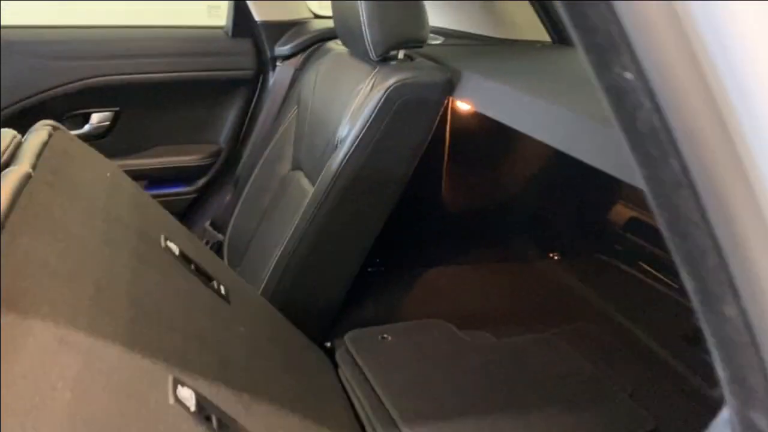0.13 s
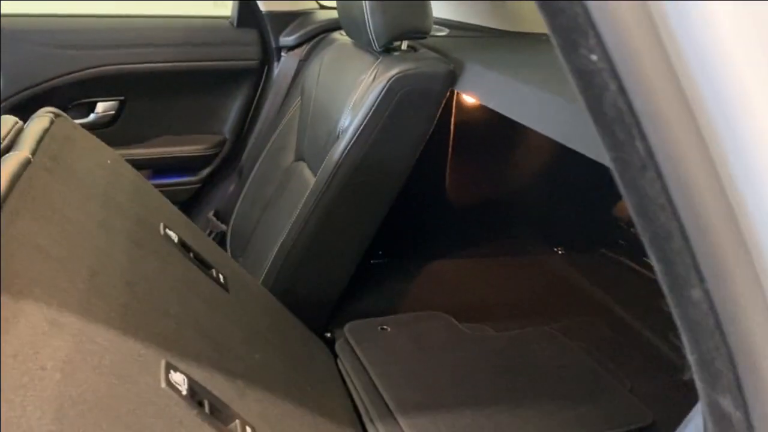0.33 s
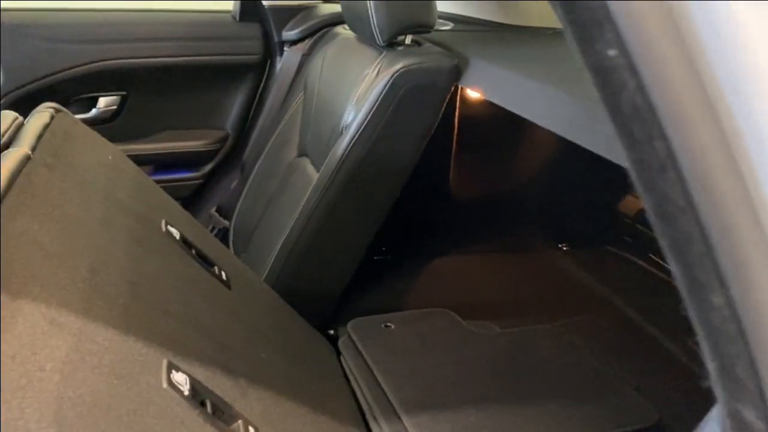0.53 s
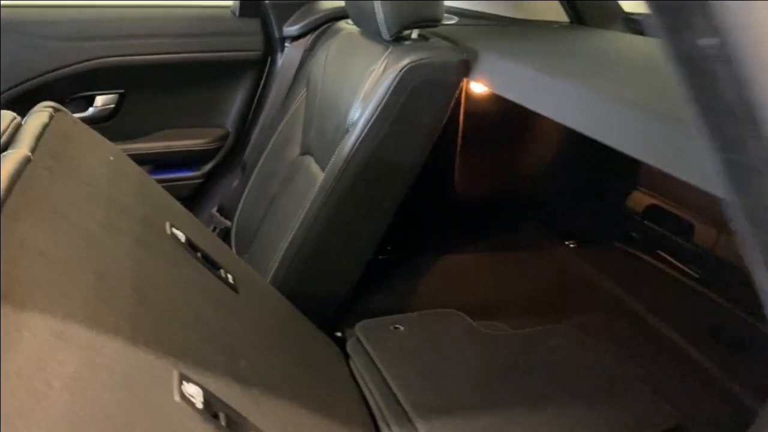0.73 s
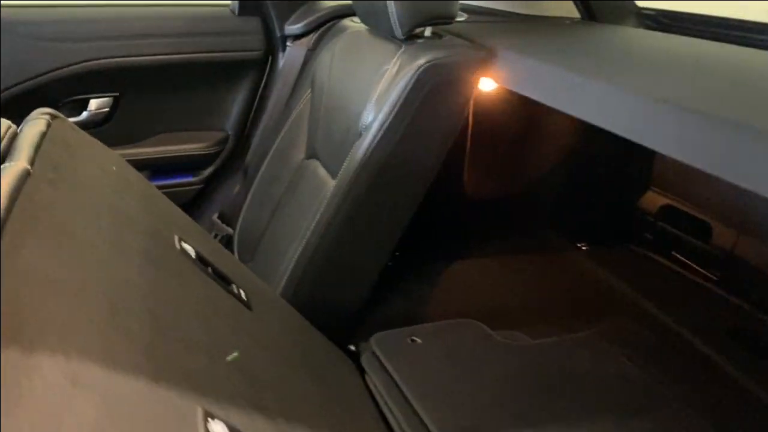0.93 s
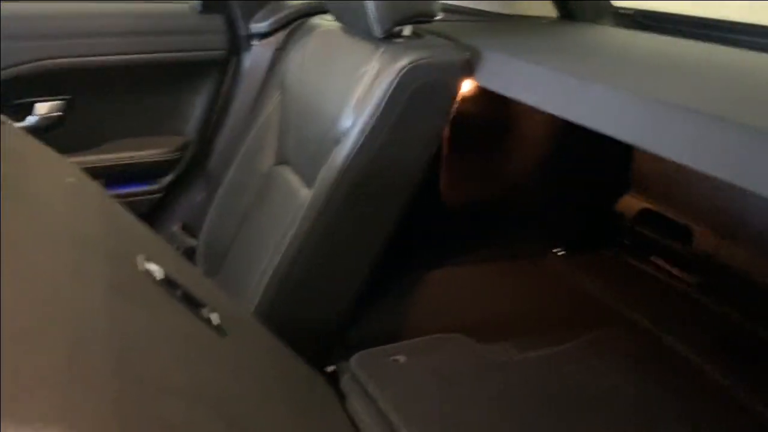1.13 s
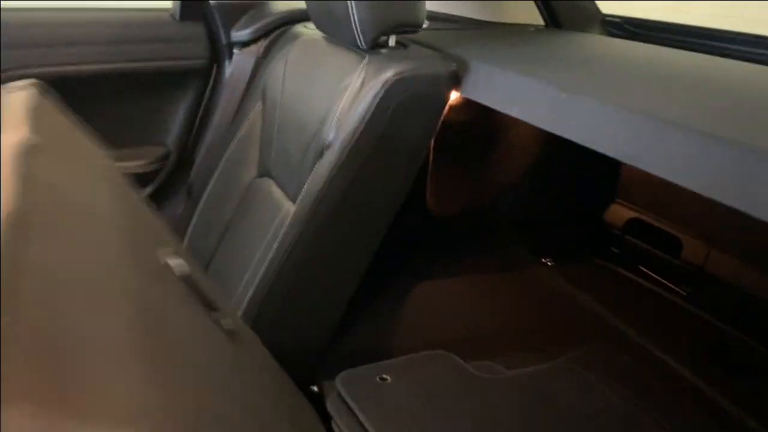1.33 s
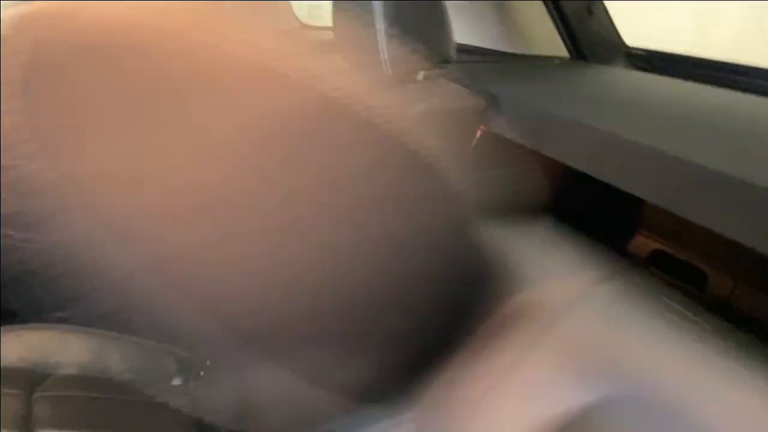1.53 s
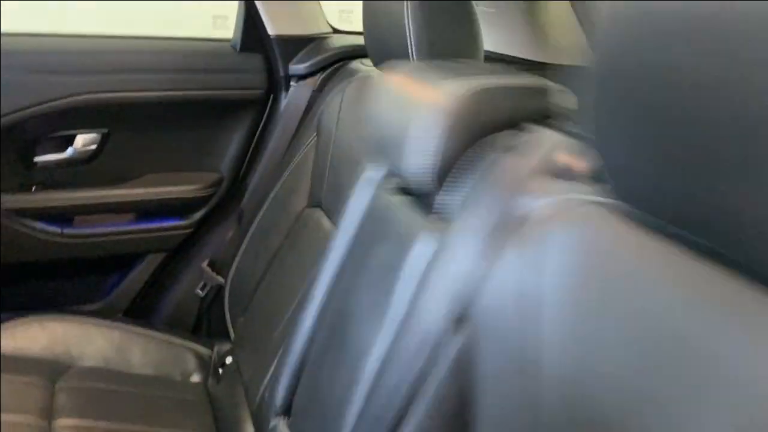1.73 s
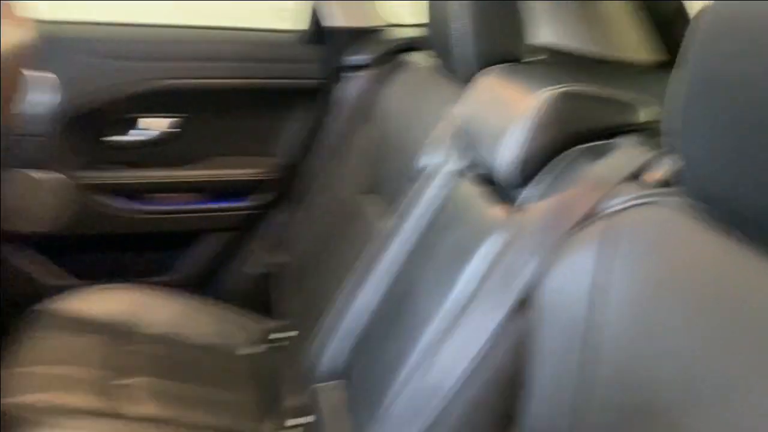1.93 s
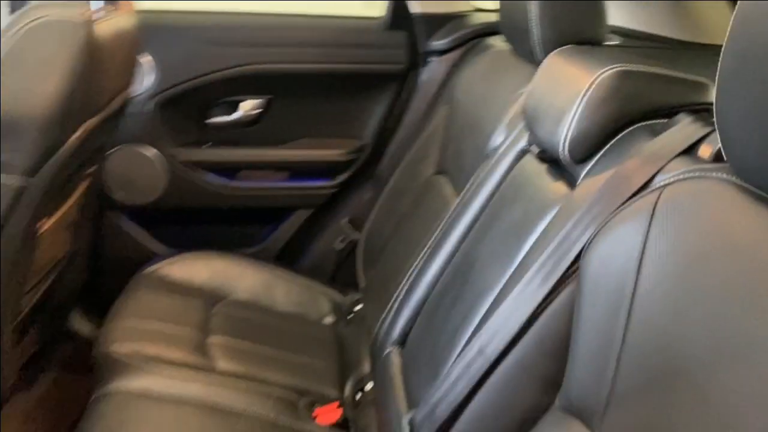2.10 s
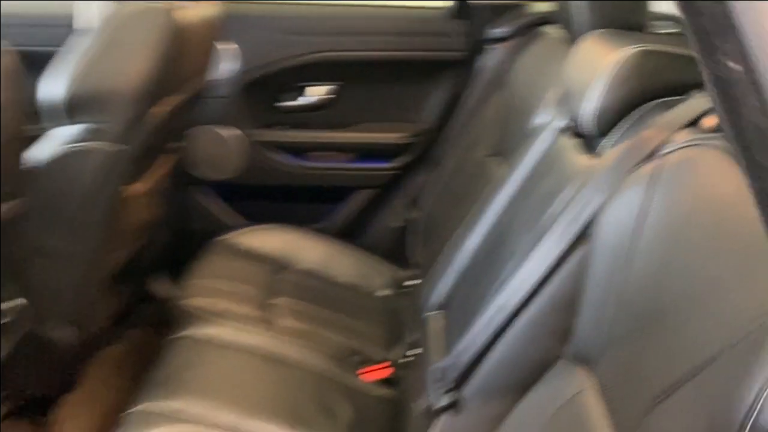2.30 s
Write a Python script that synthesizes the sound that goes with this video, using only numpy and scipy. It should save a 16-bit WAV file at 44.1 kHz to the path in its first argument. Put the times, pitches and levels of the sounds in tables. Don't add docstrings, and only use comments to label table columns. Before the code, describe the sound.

Inside a quiet parked car, a thin electric hum runs over soft air; fabric slides and stops, then the rear seatback bangs into its latch with clustered knocks, clicks and a dull shudder. Close microphone, little reverberation.

```python
import sys
import numpy as np
from scipy import signal
from scipy.fft import rfft, irfft
from scipy.io import wavfile
from scipy.ndimage import uniform_filter1d

SR = 44100
rng = np.random.default_rng(int(sys.argv[2]) if len(sys.argv) > 2 else 0)


def transcribe(signal):
    frames = np.atleast_2d(signal).T
    limited = np.clip(frames, -1, 1)
    pcm = np.round(limited * 32767).astype(np.int16)
    wavfile.write(sys.argv[1], SR, pcm)


def volts_from_decibels(level):
    exponent = np.asarray(level, float) / 20
    return 10 ** exponent


N = 104076

# (time [s], level [dB], softness [s])
STOP_KNOCKS = [
    (1.7650, -11, 0.00051),
    (1.7730, -13.5, .001),
    (1.7820, -5.5, 0.0009),
    (1.7905, -7, 0.003),
    (1.8100, -12.5, 0.00075),
]
# (time [s], level [dB], softness [s])
FRAME_BLOWS = [(1.280, -34.5, 0.00079), (1.822, -41, 0.0074), (1.862, -11.5, 0.0026), (1.907, -19, 0.0012),
               (1.952, -19.5, 0.0013), (1.993, -13.5, 0.0035), (2.013, -23, 0.0016), (2.050, -23, 0.0026),
               (2.082, -23, 0.0045), (2.115, -26, 0.0014), (2.195, -27.5, 0.0012)]
# (frequency [Hz], level [dB], t60 [s])
FRAME_MODES = [(62, -40, .15), (87.4, -2.5, 0.18), (102, -13, 0.16), (142.4, -10, 0.29), (198, -2, 0.073),
               (241, -7, 0.068), (311, -2.5, 0.06), (383, 3, 0.055), (433, -27, .06), (530, -35, .06)]
# (frequency [Hz], level [dB per Hz])
SHUDDER_SPECTRUM = [(30, -21), (90, -9), (200, -11.5), (450, -19), (900, -22), (1500, -27.5), (3000, -29.5),
                    (9000, -44)]
# (frequency [Hz], t60 [s])
SHUDDER_DECAY = [(60, 0.7), (200, 1.0), (700, 0.92), (1300, 0.34), (3000, 0.34), (6000, 0.065),
                 (12000, 0.059)]
# (time [s], level [dB], scrape length [s], top frequency [Hz])
LATCH_CONTACTS = [(1.7563, -16, .002, 6500), (1.7588, -11, .0055, 6000), (1.7645, -13, .003, 7000),
                  (1.7700, -12, .003, 9500), (1.7740, -16, .003, 8000), (1.7795, -22, .009, 9000),
                  (1.7935, -19, .014, 5200), (1.8100, -27, .006, 8000), (1.826, -33, .016, 4200),
                  (1.842, -40, .006, 8000), (1.885, -42, .02, 4200), (1.915, -42, .015, 4000)]
# (frequency [Hz], level [dB], t60 [s])
LATCH_MODES = [(660, -3, .05), (775, 0, .045), (900, -5, .04), (1100, -6, .03), (1380, -3, .03),
               (1740, -1, .025), (1970, -6, .02), (2830, -6, .02), (3220, -6, .02), (3900, -10, .02),
               (4770, -8, .012), (5600, -9, .012), (6900, -7, .012), (8100, -12, .012)]
# (time [s], level [dB], frequency [Hz], length [s])
PAWL_CHATTER = [
    (1.7585, -19, 2400, .007),
    (1.795, -27, 2320, .012),
    (1.852, -36, 2350, .012),
    (1.912, -41, 2300, .011),
    (1.940, -48, 2500, .008),
]
# (start [s], swell [s], release [s], level [dB], dullness [dB per
CLOTH_SLIDES = [
    (-.06, 0.074, 0.2, -40, -13),
    (1.10, 0.16, 0.015, -39.5, -1.7),
    (1.62, 0.134, 0.024, -43.5, -3),
]
# (frequency [Hz], level [dB per Hz])
CLOTH_SPECTRUM = [(300, 7), (1000, -3), (2200, 0.5), (3750, 2), (5500, -2.5), (8000, -0.5), (11000, -12.5),
                  (16000, -22)]
# (time [s], sixth-order pitch [Hz], whine level [dB], shaft tone level [dB])
MOTOR_COURSE = [(0, 416.6, -38, -51), (.12, 416.8, -39.5, -43.5), (.4, 416.8, -40, -44.5),
                (.6, 416.7, -40.5, -45), (.8, 416.5, -38.5, -42.5), (.93, 416.7, -36.5, -51.5),
                (1.05, 416.5, -37, -39), (1.15, 416.5, -39.5, -52), (1.45, 416.9, -39, -47),
                (1.65, 417.2, -37.5, -43), (1.9, 417.4, -37.5, -64), (2.07, 417.6, -35.5, -62),
                (2.36, 417.7, -39, -45)]
# (frequency [Hz], width [Hz], level [dB])
EARLIER_BANDS = [(160, 50, -43), (400, 120, -48), (3050, 90, -48), (3970, 90, -48), (4770, 90, -47)]
# (frequency [Hz], level [dB per Hz])
AIR_SPECTRUM = [(30, -19), (50, -15.5), (110, 0), (260, -9.5), (700, -16.5), (3800, -22.5), (8000, -29.5),
                (16000, -50.5)]
# (frequency [Hz], width [Hz], level [dB])
AIR_RESONANCES = [(244.5, 62, -55.5), (657, 20, -63), (1400.5, 72, -56.5), (2240, 270, -59.5),
                  (3680, 1100, -54.5), (7220, 790, -62)]


def evened(x):
    return x / np.sqrt(np.mean(x ** 2) + 1e-20)


def read(points, hz):
    f, value = np.transpose(points)
    return np.interp(np.log(hz + 1), np.log(f + 1), value)


def add(mix, s, sound):
    at = round(s * SR)
    sound = sound[max(-at, 0):]
    part = mix[max(at, 0):][:len(sound)]
    part += sound[:len(part)]


def coloured(count, db_of):
    hz = np.fft.rfftfreq(count, 1 / SR)
    return evened(irfft(rfft(rng.standard_normal(count)) * volts_from_decibels(db_of(hz)), count))


def slow(rate_hz):
    return coloured(N, lambda hz: -40 * np.log10(1 + (hz / rate_hz) ** 2))


def resonate(x, hz, width):
    r = np.exp(-np.pi * abs(width) / SR)
    return 2 * signal.lfilter([1 - r], [1, -r * np.exp(2j * np.pi * hz / SR)], x).real


def band_noise(x, hz, width):
    return evened(resonate(resonate(x, hz, width), hz, width))


def ring(modes, count):
    t = np.arange(count) / SR
    return sum(volts_from_decibels(db - 60 * t / t60) * np.sin(2 * np.pi * hz * t) for hz, db, t60 in modes)


def high_pass(x, order, hz):
    return signal.sosfilt(signal.butter(order, hz, "high", fs=SR, output="sos"), x)


def pushes(table):
    push, t = np.zeros(N), np.arange(1024) / SR
    for s, db, soft in table:
        bump = t / soft * np.exp(-t / soft * 2)
        add(push, s, volts_from_decibels(db) * bump / bump.sum())
    return signal.fftconvolve(push, ring(FRAME_MODES, count=SR // 2))[:N]


def frame():
    return pushes(FRAME_BLOWS) + high_pass(pushes(STOP_KNOCKS), 2, 150)


def boom():
    start_s, rise_s, hold_s, t60_s, pitch_hz, level_db = 1.7625, .018, .022, .075, 80, -8
    out, t = np.zeros(N), np.arange(SR // 2) / SR
    rise = np.sin(np.pi / 2 * np.minimum(t / rise_s, 1)) ** 2
    swing = rise * volts_from_decibels(-60 * np.maximum(t - rise_s - hold_s, 0) / t60_s)
    add(out, start_s, volts_from_decibels(level_db) * swing * np.sin(2 * np.pi * pitch_hz * t))
    return out


def latch():
    out, t = np.zeros(N), np.arange(2048) / SR
    metal = ring(LATCH_MODES, count=6000)
    metal = metal / np.linalg.norm(metal)
    for s, db, length, top_hz in LATCH_CONTACTS:
        grit = rng.standard_normal(len(t)) * volts_from_decibels(2.8 * rng.exponential(1, len(t)))
        grit = evened(grit) * np.minimum(t / .001, 1) / (1 + (t / length) ** 5)
        both = signal.fftconvolve(grit, metal) + np.pad(grit, (0, 5999))
        add(out, s, volts_from_decibels(db) * signal.lfilter(*signal.butter(3, top_hz, fs=SR), both))
    for s, db, hz, length in PAWL_CHATTER:
        hit = rng.standard_normal(len(t)) * np.sin(np.pi * np.minimum(t / length, 1)) ** .5
        rattle = band_noise(hit, hz, 240) * np.sqrt(length / t[-1])
        add(out, s, volts_from_decibels(db) * rattle)
    return signal.lfilter(*signal.butter(2, [400, 13000], "band", fs=SR), out)


def cabin(x):
    t = np.arange(SR // 4) / SR
    tail = rng.standard_normal(len(t)) * volts_from_decibels(-60 * t / 0.086) * (t > .002)
    tail = signal.lfilter(*signal.butter(1, 6000, fs=SR), tail)
    return signal.fftconvolve(x, tail / np.linalg.norm(tail))[:N]


def fading(x):
    hz, t, z = signal.stft(x, SR, nperseg=512)
    z = z * volts_from_decibels(-60 * t / read(SHUDDER_DECAY, hz)[:, None])
    return signal.istft(z, SR, nperseg=512)[1][:len(x)]


def shudder():
    start_s, level_db, onset_s = 1.79, -22, .025
    out, t = np.zeros(N), np.arange(SR) / SR
    lumps = volts_from_decibels(1.5 * evened(uniform_filter1d(rng.standard_normal(SR), size=600)))
    rumble = fading(coloured(SR, lambda hz: read(SHUDDER_SPECTRUM, hz)) * lumps)
    add(out, start_s, volts_from_decibels(level_db) * np.minimum(t / onset_s, 1) * rumble)
    return out


def cloth():
    out, t = np.zeros(N), np.arange(SR // 2) / SR
    for start, swell, release, db, tilt_db in CLOTH_SLIDES:
        speed = np.minimum(t / swell, 1) ** 0.72 * volts_from_decibels(-20 * np.maximum(t - swell, 0) / release)
        rub = coloured(len(t), lambda hz: read(CLOTH_SPECTRUM, hz) + tilt_db * np.log2(np.maximum(hz, 4500) / 4500))
        grain = volts_from_decibels(.6 * evened(uniform_filter1d(rng.standard_normal(len(t)), size=200)))
        add(out, start, volts_from_decibels(db) * speed * rub * grain)
    return out


def motor():
    s, hz, whine_db, shaft_db = np.transpose(MOTOR_COURSE)
    t = np.arange(N) / SR
    turn = 2 * np.pi * np.cumsum(np.interp(t, s, hz)) / SR
    whine = volts_from_decibels(np.interp(t, s, whine_db)) * np.sin(turn)
    shaft_level = volts_from_decibels(np.interp(t, s, shaft_db) - 2.3 * slow(5.0))
    shaft = shaft_level * np.sin(turn / 6 + .3 * slow(4.0))
    return np.sqrt(2) * (whine + shaft)


def earlier():
    fade_s = .085
    t = np.arange(N) / SR
    white = rng.standard_normal(N)
    bands = sum(volts_from_decibels(db) * band_noise(white, hz, width) for hz, width, db in EARLIER_BANDS)
    return bands * volts_from_decibels(-10 * (t / fade_s) ** 2)


def air():
    level_db, shut_s, shut_db = -42, 1.9, -2.0
    bed = volts_from_decibels(level_db) * coloured(N, lambda hz: read(AIR_SPECTRUM, hz))
    white = rng.standard_normal(N)
    bed = bed + sum(volts_from_decibels(db) * band_noise(white, hz, width) for hz, width, db in AIR_RESONANCES)
    treble = signal.filtfilt(*signal.butter(1, 1500, "high", fs=SR), bed)
    return bed + (volts_from_decibels(shut_db) - 1) * treble * (np.arange(N) > shut_s * SR)


def scene():
    body = high_pass(frame() + shudder(), 3, 55)
    metal = latch()
    bed = cloth() + motor() + earlier() + air()
    return (body + boom() + metal + volts_from_decibels(-12) * cabin(metal) + bed)[None]


def band_limit(x):
    return signal.sosfilt(signal.butter(12, 16290, fs=SR, output="sos"), x)


def record(dry):
    duck_from_db, duck_share, recover_db_per_s, limit = -13.5, 0.15, 70., .85
    dry = signal.lfilter(*signal.butter(3, 52, "high", fs=SR), dry)
    power_db = 10 * np.log10(abs(uniform_filter1d(dry[0] ** 2, size=800)) + 1e-12)
    fall = np.arange(N) * recover_db_per_s / SR
    held_db = np.maximum.accumulate(power_db + fall) - fall
    over_db = np.maximum(held_db - duck_from_db, 0)
    ducked = dry / volts_from_decibels(duck_share * uniform_filter1d(over_db, size=400))
    return band_limit(limit * np.tanh(ducked / limit))


dry = scene()
out = record(dry)
transcribe(out)
```